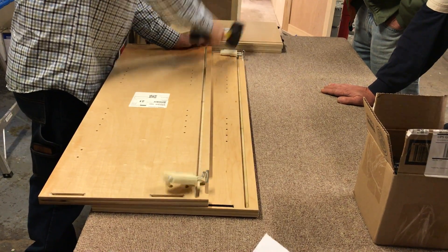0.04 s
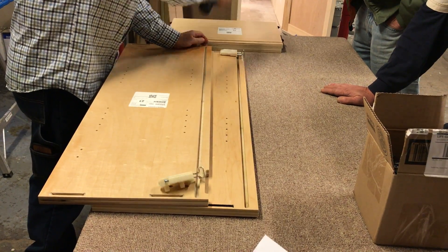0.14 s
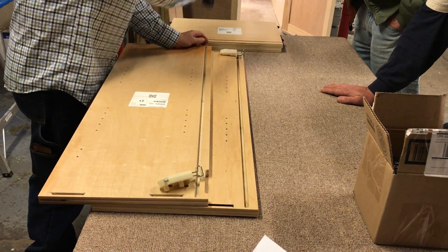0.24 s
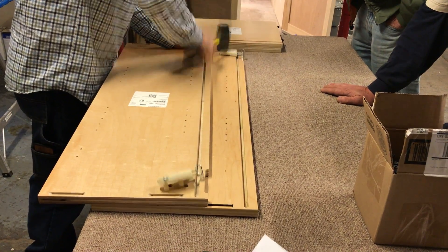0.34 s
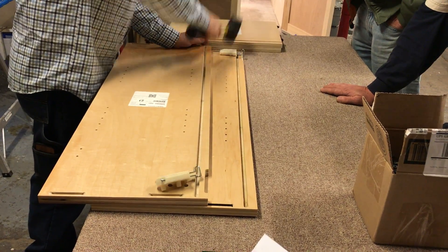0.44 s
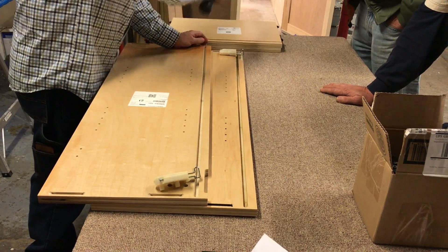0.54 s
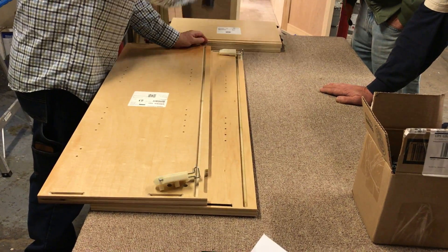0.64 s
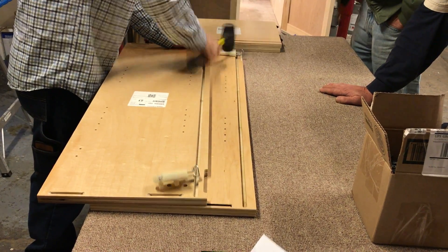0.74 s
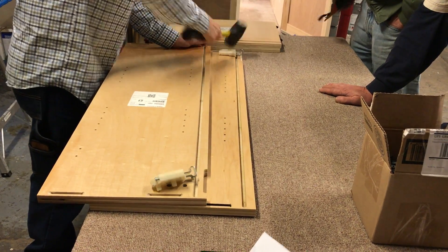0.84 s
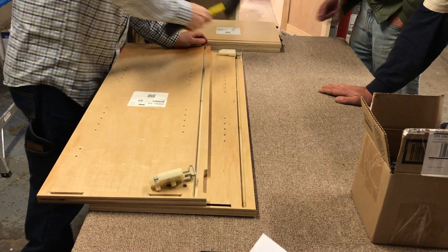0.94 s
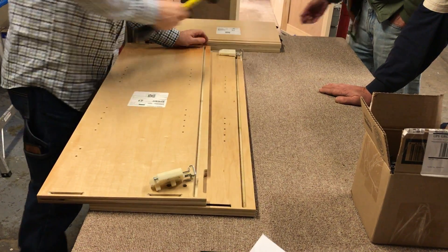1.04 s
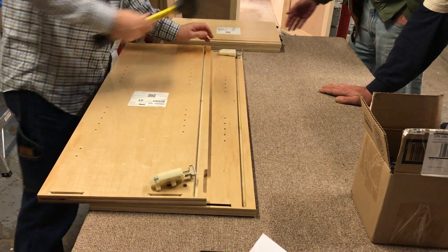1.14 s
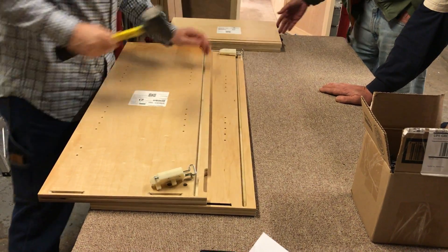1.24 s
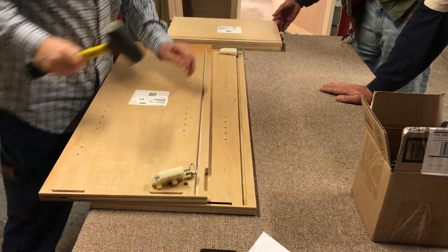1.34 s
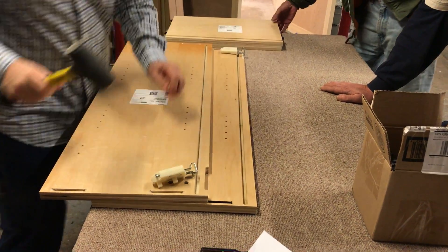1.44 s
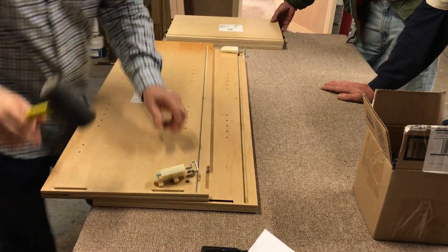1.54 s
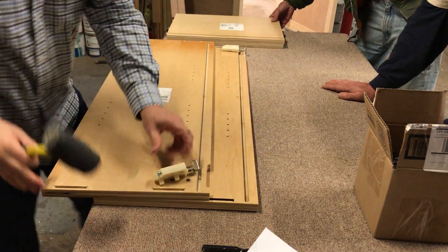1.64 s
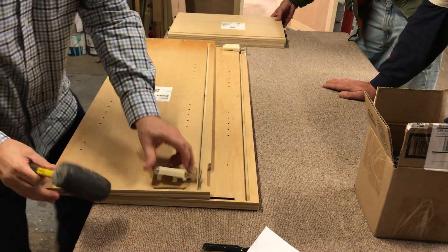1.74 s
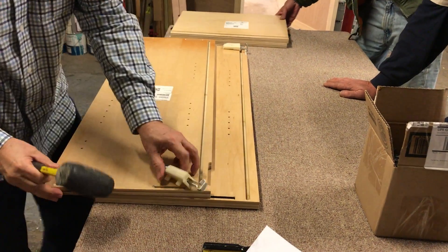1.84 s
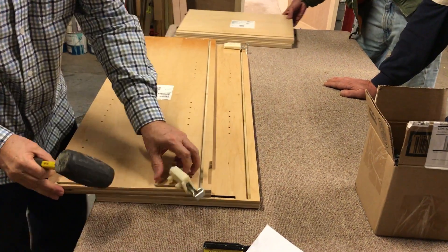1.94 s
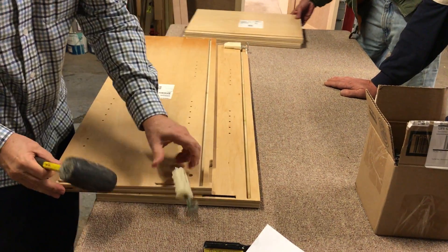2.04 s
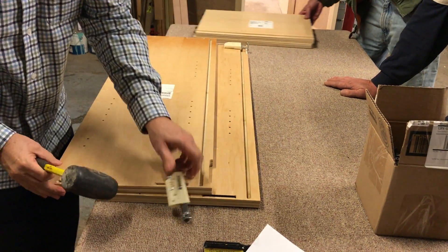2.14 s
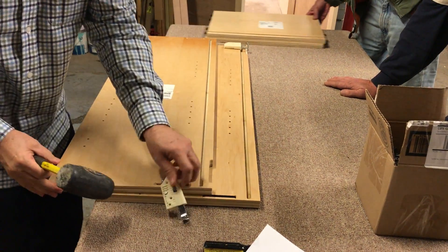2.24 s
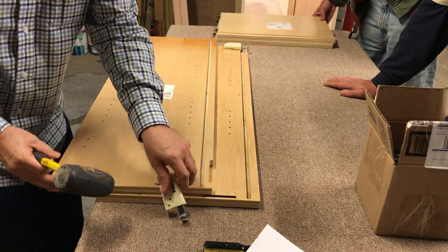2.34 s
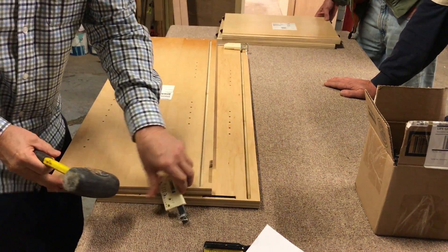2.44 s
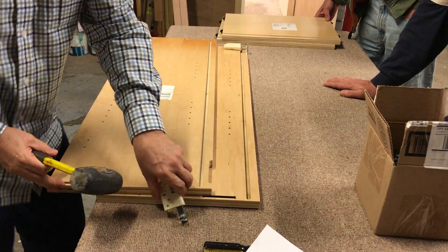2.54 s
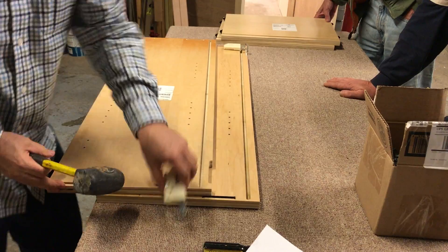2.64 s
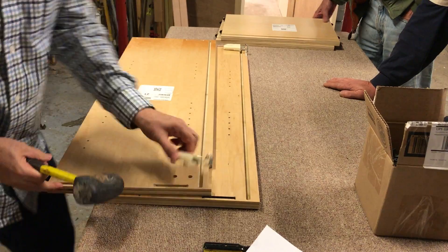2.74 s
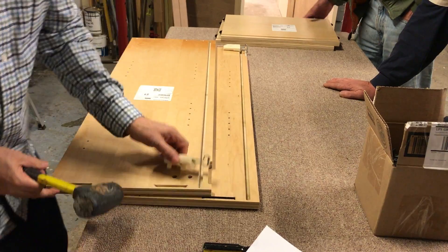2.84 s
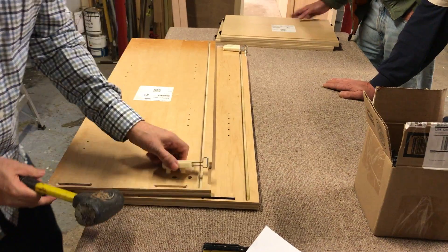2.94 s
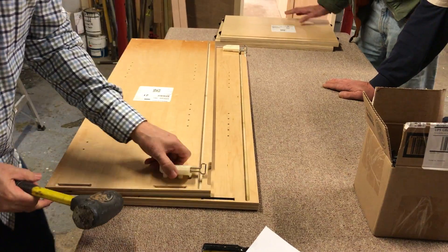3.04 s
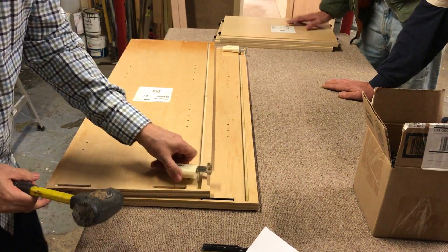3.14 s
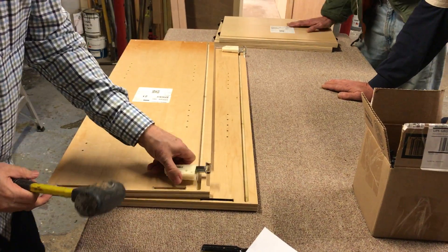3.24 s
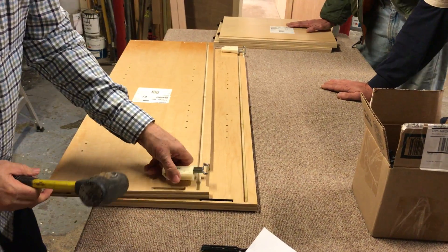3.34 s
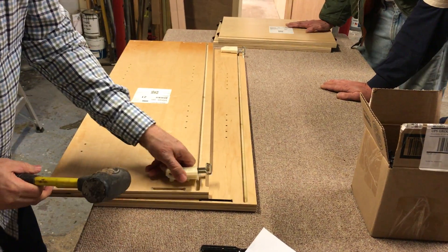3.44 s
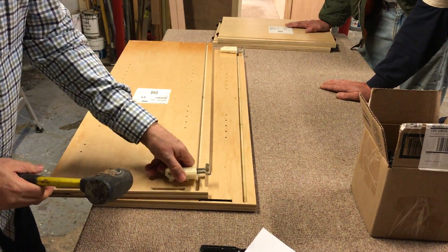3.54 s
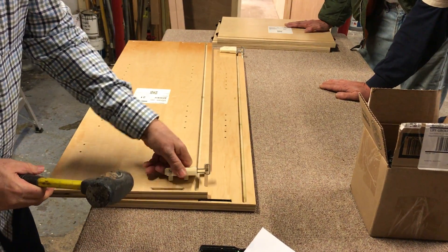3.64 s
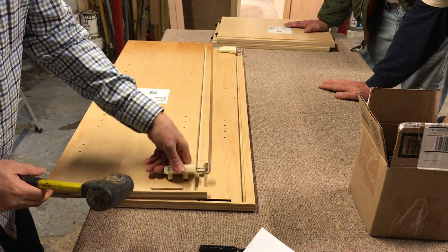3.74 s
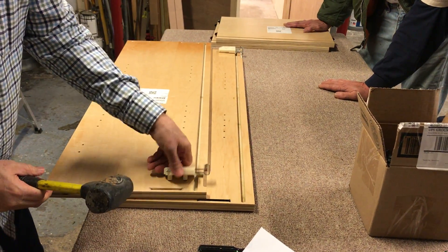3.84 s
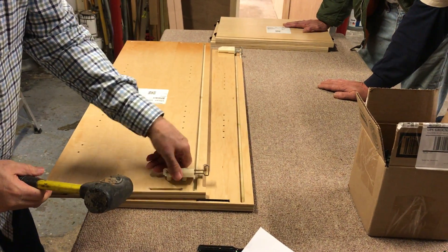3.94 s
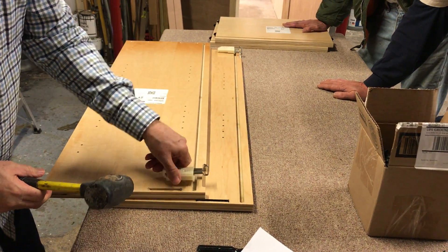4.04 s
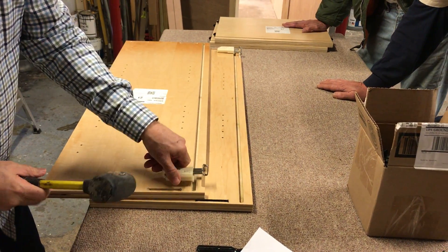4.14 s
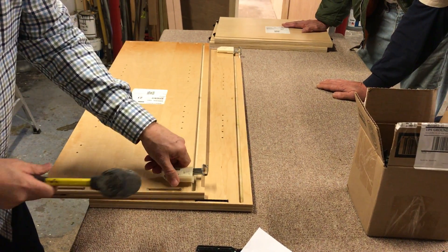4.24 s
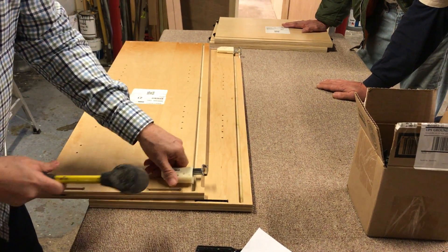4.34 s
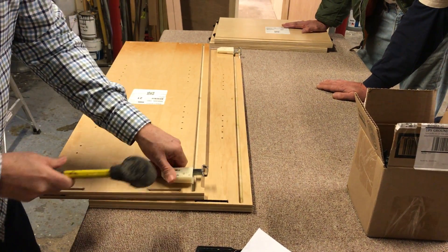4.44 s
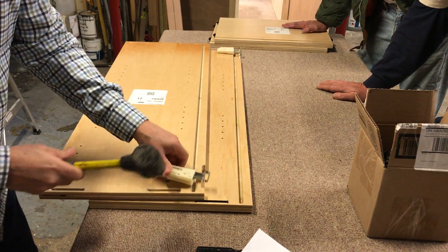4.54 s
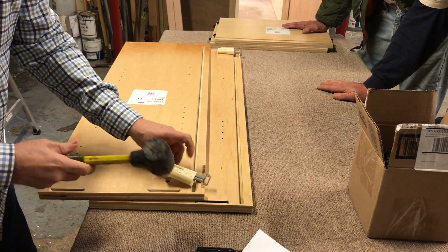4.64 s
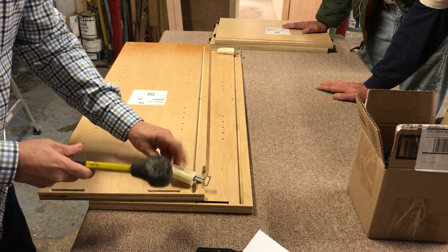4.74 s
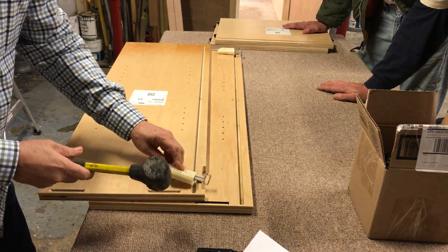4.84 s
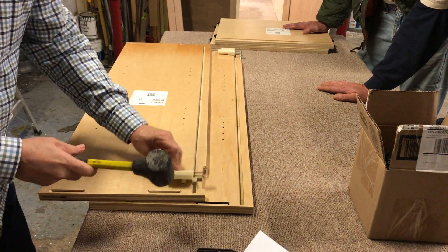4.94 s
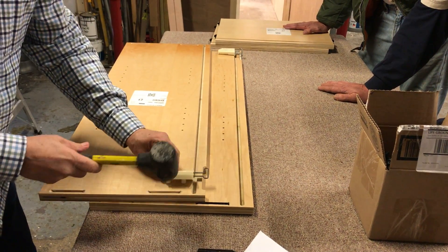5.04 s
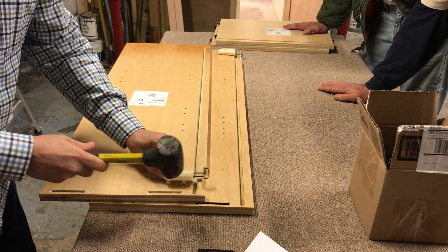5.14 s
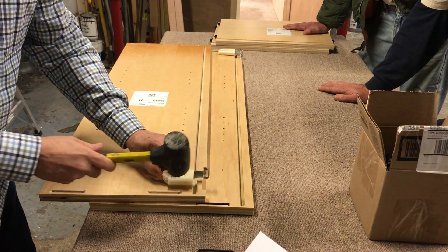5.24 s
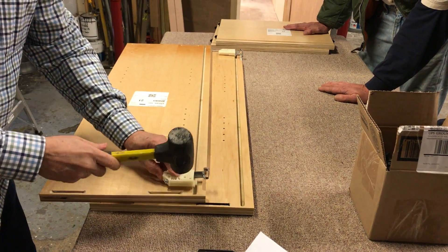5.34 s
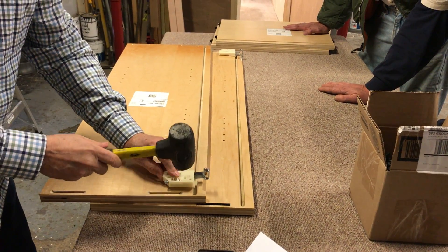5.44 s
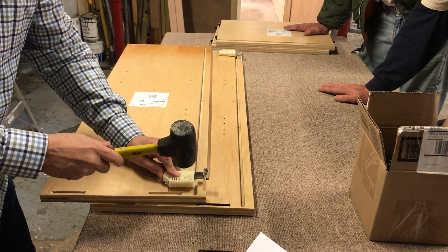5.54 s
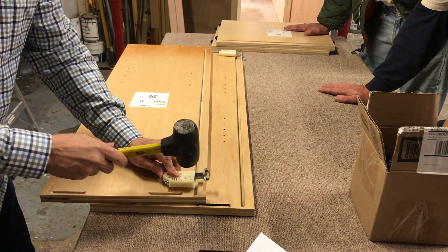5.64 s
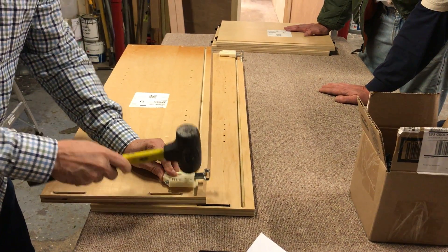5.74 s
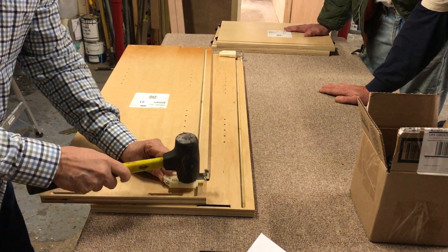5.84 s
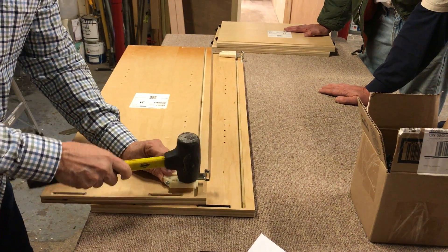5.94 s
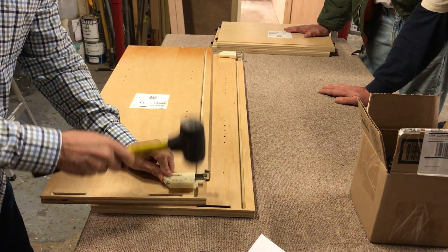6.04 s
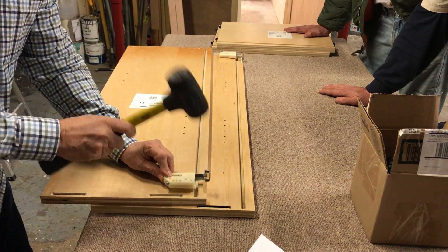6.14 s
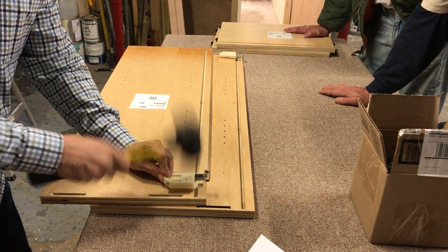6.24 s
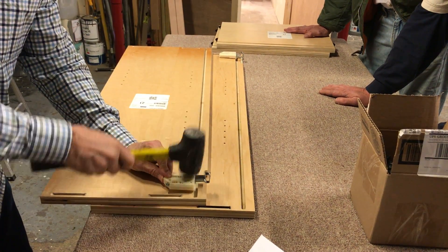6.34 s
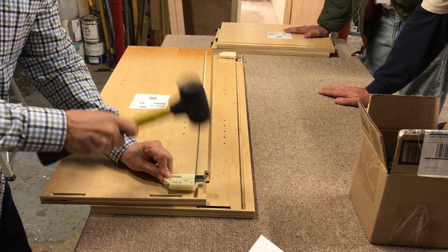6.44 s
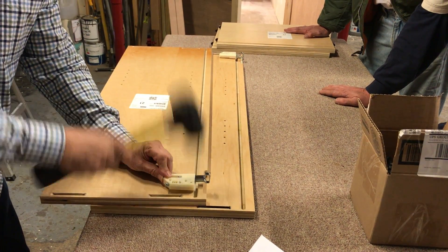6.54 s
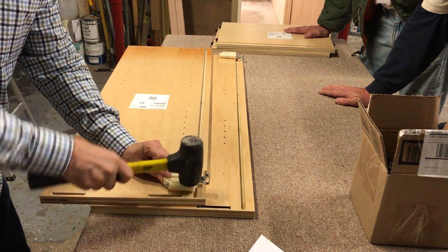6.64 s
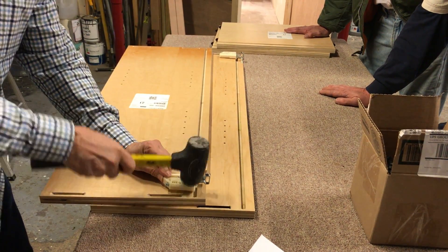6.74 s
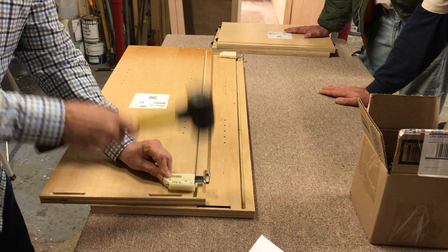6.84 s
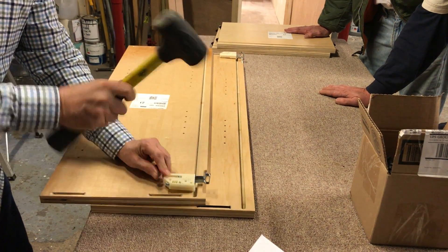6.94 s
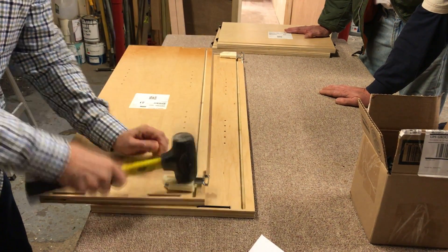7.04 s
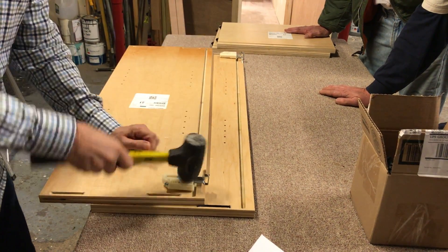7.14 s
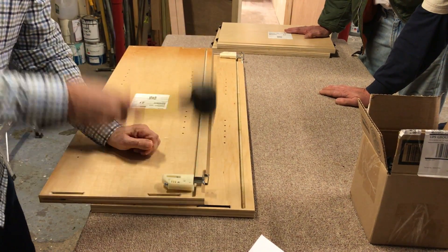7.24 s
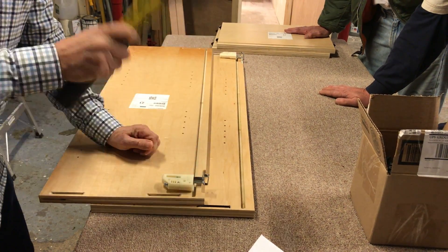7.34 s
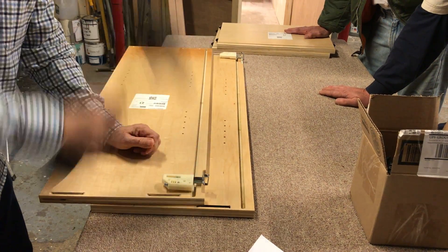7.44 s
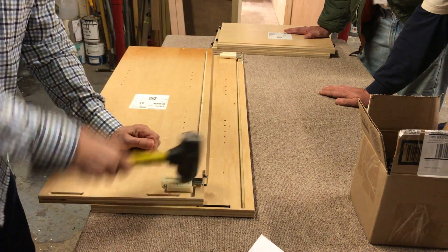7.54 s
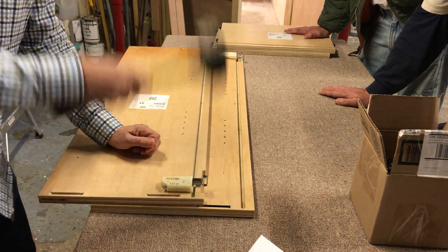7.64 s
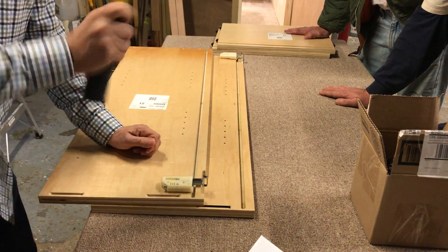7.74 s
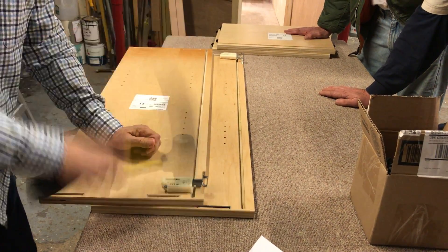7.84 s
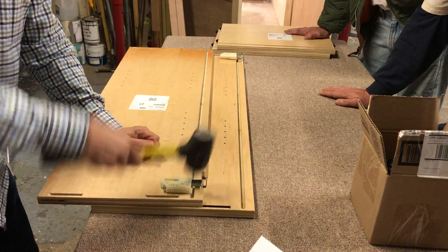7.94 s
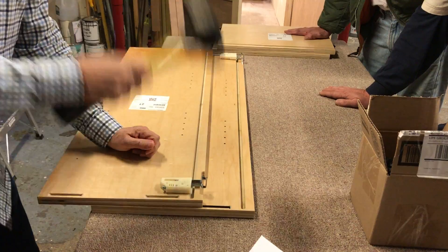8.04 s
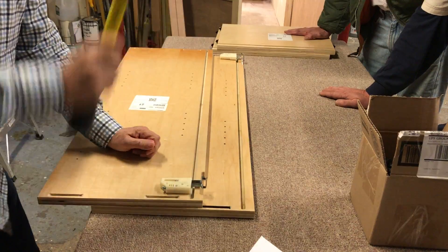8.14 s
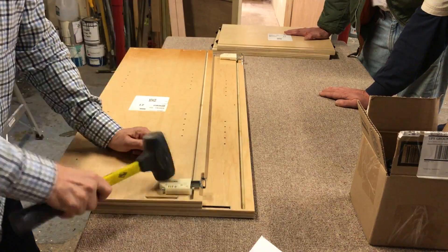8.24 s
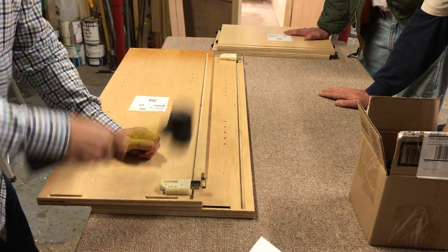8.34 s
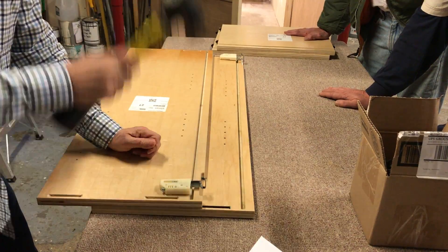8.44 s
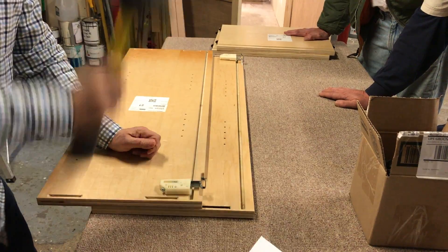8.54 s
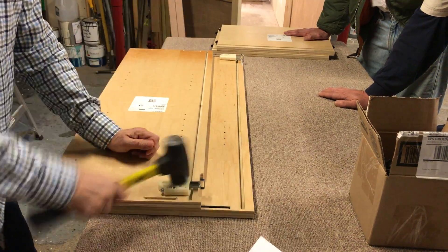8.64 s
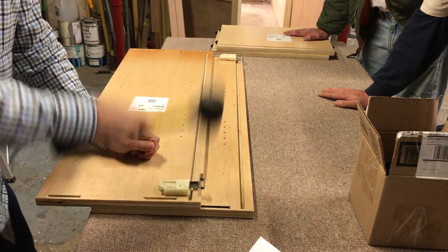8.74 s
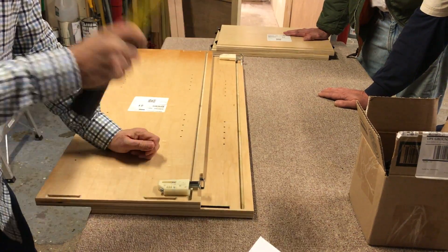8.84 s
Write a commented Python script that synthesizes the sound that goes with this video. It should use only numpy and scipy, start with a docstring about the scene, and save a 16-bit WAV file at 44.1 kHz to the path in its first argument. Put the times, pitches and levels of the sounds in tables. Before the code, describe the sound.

Three mallet blows on a wooden panel, then plastic rattling and quiet handling, a sharp tap, and seven heavier mallet blows over faint machine hum.

```python
"""A rubber mallet hits the far end of a wooden cabinet panel three times; each blow makes the panel ring and
tosses a loose plastic fitting, which bounces, while a steel catch jingles. The fitting is then picked up,
rattling and scraping as noise bursts and plastic rings, and a sleeve and soft bumps brush the wood. It is set
at the near end, tapped once (the mallet rebounds softly) and driven home with seven blows whose crack shrinks
with the gap. A machine hums in moving air throughout, with dips in level, and a fast limiter holds down the
loud peaks."""
import sys
import numpy as np
from scipy import signal
from scipy.fft import rfft, irfft, next_fast_len
from scipy.io import wavfile
from scipy.ndimage import uniform_filter1d, minimum_filter1d, map_coordinates

SR = 44100
rng = np.random.default_rng(int(sys.argv[2]) if len(sys.argv) > 2 else 0)


def generate_wav(signal):
    """Clip the signal to [-1, 1] and save it as 16-bit WAV at the path in sys.argv[1]."""
    frames = np.transpose(np.atleast_2d(signal))
    scaled = np.clip(frames, -1, 1) * 32767
    pcm = np.round(scaled).astype(np.int16)
    wavfile.write(sys.argv[1], SR, pcm)


N = 392049
T = np.arange(int(0.7 * SR)) / SR  # time within one short sound (s)

# Mallet blows: start_s, force_db (relative), hardness_db (treble), gap (left under the fitting, 0-1),
# place (0 near end, 1 far end)
MALLET_BLOWS = [(0.061, -3, 0.5, 0.52, 0.84), (0.446, -3.5, .5, 0.36, 0.95), (0.8414, -3, -0.5, .35, .95),
                (5.918, -30, -7.5, 0.82, 0.294), (6.368, -4.5, -2, 0.95, 0),
                (6.6837, -2.5, -5, 0.84, 0.018), (7.148, -2.5, 1.5, 0.86, 0.046),
                (7.588, -1.5, -1.5, 0.82, .1), (7.962, 0, -0.5, 0.22, 0.057),
                (8.3325, -4, 1.5, 0.44, 0.069), (8.715, 0, -2.5, 0.06, 0.025)]
# Color of the mallet's crack: pitch_hz, level_db (relative, per Hz)
CRACK_COLOR = [(300, -26), (2000, 2.5), (4000, 1.5), (6000, -4), (8500, 0), (11000, -2.5), (15000, -6)]
SEATED_FLEX_DB, GAP_FLEX_DB = -5.5, 10  # low bending of the panel with no gap; what a full gap adds
SOFT_FLEX = 0.76  # dB more low bending per dB less force: a light tap stays in contact longer
SEATED_CRACK_DB, GAP_CRACK_DB, FAR_CRACK_DB = -5, 9, -21.5  # crack with no gap; full gap and far end add


def mallet():
    """The head cracks on contact and the whole panel rings; a smaller gap gives less crack and low bending."""
    track = np.zeros(N)
    for start_s, force_db, hardness_db, gap, place in MALLET_BLOWS:
        flex_db = SEATED_FLEX_DB + GAP_FLEX_DB * gap - SOFT_FLEX * force_db
        crack_db = SEATED_CRACK_DB + GAP_CRACK_DB * gap + FAR_CRACK_DB * place
        crack_shape = fade(0.0052) + amp(-15) * fade(0.095)
        crack = amp(crack_db) * noise(CRACK_COLOR, len(T)) * crack_shape

        def hardness(hz):
            """Lift or lower the treble above about 1500 Hz, as a harder or softer contact does."""
            return (1500 + 1j * hz * amp(hardness_db)) / (1500 + 1j * hz)

        knock = filtered(panel(place, flex_db, grain_db=-7), hardness)
        # after a light tap the head stays down and damps the ring
        resting = fade(0.094 + 3 * amp(force_db))
        blow = amp(force_db) * (crack + knock * resting)
        add(track, start_s, in_room(blow, wet_db=-21.5))
    return track


# Clear ringing tones (modes) of the panel: pitch_hz, ring_s (time to die by 60 dB before other damping),
# near_db, far_db (relative strength when struck at either end)
PANEL_MODES = [(54, .25, -33, -37.5), (74.6, 0.057, -28.5, -27.5), (94.8, 0.35, -17, -16.5),
               (151, 0.18, -3, -16), (164.4, 0.12, -9.5, -8.5), (181.2, 0.21, -30, -9),
               (219, 0.28, -18.5, -20), (253.5, .3, -17.5, -30), (284.6, 0.5, -28.5, -33),
               (304.4, 0.16, -27, -9), (325.8, 0.22, -23, -15), (364, 0.17, -24, -21.5),
               (415.3, 0.21, -28, -22.5), (483, 0.083, -19.5, -20.5), (575, 0.12, -25, -16.5),
               (646.5, 0.11, -15.5, -23), (678.3, 0.2, -21.5, -20), (823, 0.084, -26, -28.5),
               (915, 0.17, -23.5, -27.5), (1091, 0.071, -18.5, -25), (1248, 0.13, -19.5, -16),
               (1338, 0.1, -22.5, -19), (1450, 0.054, -28, -14), (1510, .1, -30, -15),
               (1610, 0.05, -21, -22.5), (1831, 0.11, -20, -9.5), (2116, 0.085, -23.5, -19),
               (2520, .12, -22.5, -29), (2890, 0.15, -36.5, -27.5), (3074, .1, -25.5, -27),
               (3430, 0.035, -29, -35), (3700, 0.057, -32.5, -36.5), (3880, .1, -44.5, -30.5)]
# Color of the panel's crowded higher modes: pitch_hz, near_db, far_db (relative, per Hz)
CROWD_COLOR = [(25, -18, -25), (110, -11, -19.5), (281.7, 3, 2.5), (744, -1.5, -9), (1450, -3, -4),
               (2600, -7.5, -13.5), (4630, -19, -21.5), (9000, -26, -29.5), (14950, -19, -27.5)]
# How long the crowded modes last: pitch_hz, ring_s (time to die by 60 dB before other damping)
CROWD_RING = [(60, .2), (300, 0.16), (1500, 0.15), (5000, 0.15), (15000, 0.12)]


def panel(place, flex_db, grain_db):
    """A short contact push, clear modes and crowded ones, with strengths set by the place struck."""
    ring = np.zeros(len(T))
    for hz, ring_s, near_db, far_db in PANEL_MODES:
        place_db = near_db + place * (far_db - near_db)
        low_db = flex_db / (1 + (hz / 230) ** 4)
        level_db = place_db + low_db + rng.normal(0, 1)
        pitch_hz = hz * (1 + rng.normal(0, 0.006))
        start_cycle = rng.random() * (hz > 200)  # only modes above 200 Hz start at a random point
        tone = np.sin(2 * np.pi * (pitch_hz * T + start_cycle))
        ring += amp(level_db) * tone * fade(ring_s) * rise(0.0023 * 150 / hz)
    color = [(hz, near + place * (far - near)) for hz, near, far in CROWD_COLOR]
    crowd = dying(noise(color, len(T)), CROWD_RING) * rise(0.00081)
    # the contact rings for barely a cycle, more strongly toward the far end
    push_t = T - 0.0006
    push = np.sin(2 * np.pi * 2000 * push_t) * np.exp(-(push_t / 0.00024) ** 2)
    wave = ring + amp(grain_db) * (crowd + amp(17 * place) * push)
    # bending waves are slower at low pitch, so deep modes arrive last, the more so from the far end
    lag_at_1000_hz_s = 0.001091 + 0.0011 * place
    return filtered(wave, lambda hz: np.exp(-4j * np.pi * lag_at_1000_hz_s * np.sqrt(1000 * hz)))


HOP_S, BOUNCE_S, BOUNCE_SHRINK = 0.086, 0.023, 0.83  # first flight, first bounce, each bounce over the last
HOP_DB, BOUNCE_LOSS_DB = -29, 7  # first landing relative to the blow's force; loss per bounce
HOP_PRESSURE = 0.56  # pressure on the wood (0-1)


def hops():
    """A far-end blow tosses the fitting lying loose at the near end; it lands in ever quicker bounces."""
    track = np.zeros(N)
    for start_s, force_db, _, _, place in MALLET_BLOWS:
        if place > 0.5:
            for bounce in range(3):
                flight_s = HOP_S + BOUNCE_S * sum(BOUNCE_SHRINK ** j for j in range(bounce))
                level_db = force_db + HOP_DB - BOUNCE_LOSS_DB * bounce
                add(track, start_s + flight_s, click(level_db, HOP_PRESSURE))
    return track


# The fitting is picked up, rattles and snaps into its holes: start_s, level_db (relative),
# pressure (on the wood, 0-1)
FITTING_CLICKS = [(1.8364, -24, 0.62), (1.9618, -29.5, 0.27), (2.143, -29.5, 0.14), (2.192, -19.5, 0.14),
                  (2.2323, -30, 0), (2.2443, -23, 0.14), (2.2843, -23, 0.13), (2.3118, -23, 0.12),
                  (2.3202, -25, 0.15), (2.3812, -28.5, 0.13), (2.6594, -34.5, .05), (2.9827, -35, 1),
                  (3.1139, -32.5, 0.69), (3.903, -38, .95), (3.9597, -31.5, 0.41), (4.6826, -36, 0.36),
                  (4.7053, -36.5, 0.5), (4.8722, -40, 0.23), (5.031, -37, 0.96), (5.0601, -29.5, .62),
                  (5.907, -19.5, 0.06), (5.9131, -18, 0.37)]
# Ticks of loose parts while the fitting is turned in the hand: start_s, end_s, ticks_per_s,
# level_db (relative, before random variation)
LOOSE_RATTLES = [(2.235, 2.335, 45, -37), (2.55, 2.881, 6, -47), (5.284, 5.349, 30, -43)]
THUD_DB, THUD_FLEX_DB = 5.5, -7.5  # panel thud relative to the click at full pressure; its low bending


def fitting():
    """The fitting clicks and, as far as it is pressed down, thuds on the panel; loose parts tick unevenly."""
    track = np.zeros(N)
    for start_s, level_db, pressure in FITTING_CLICKS:
        panel_thud = thud(level_db + THUD_DB, THUD_FLEX_DB)
        add(track, start_s, click(level_db, pressure) + pressure * panel_thud)
    for start_s, end_s, ticks_per_s, level_db in LOOSE_RATTLES:
        for tick_s in scattered(start_s, end_s, ticks_per_s):
            add(track, tick_s, click(level_db + rng.normal(0, 2.2), pressure=0))
    return track


# Ringing tones of the plastic shell: pitch_hz, width_hz (wider dies sooner),
# level_db (relative, before random variation)
PLASTIC_TONES = [(2900, 90, -3.5), (4110, 320, -13.5), (7170, 190, -3.5), (8570, 87, -3.5),
                 (9430, 100, -2.5), (12670, 290, -10), (14200, 110, -12.5), (14800, 160, -15)]
# Color of a plastic snap before the treble tilt: pitch_hz, level_db (relative, per Hz)
SNAP_COLOR = [(600, -19.5), (1500, -5), (3000, 8.5), (5500, 0), (9000, -1), (15000, 0)]
# Color of the wood under a click: pitch_hz, level_db (relative, per Hz)
KNOCK_COLOR = [(100, -17.5), (300, 6.5), (700, -8), (1050, -7), (1280, -3.5), (1700, -9.5), (2200, -7),
               (4000, -23)]
FREE_TREBLE_DB, PRESSED_TREBLE_DB = 9.5, -32  # tilt per tenfold pitch when free; what full pressure adds
KNOCK_DB = -6.5  # wood knock at full pressure, relative to the click


def click(db, pressure):
    """One plastic contact chatters briefly and rings the shell; pressed on the wood it is duller and knocks."""
    ring = np.zeros(len(T))
    for hz, width_hz, level_db in PLASTIC_TONES:
        tone = np.sin(2 * np.pi * hz * T) * np.exp(-np.pi * width_hz * T)
        ring += amp(level_db + rng.normal(0, 3.15)) * tone
    treble_db = FREE_TREBLE_DB + PRESSED_TREBLE_DB * pressure ** 3
    color = [(hz, level_db + treble_db * np.log10(hz / 3000)) for hz, level_db in SNAP_COLOR]
    snap = noise(color, len(T)) * (fade(0.0072) + amp(-12.5) * fade(0.084))
    contact = amp(-16.5) * ring + amp(-3.5) * snap
    second_contact = np.roll(contact, int(SR * rng.uniform(0.0007, 0.0038)))
    chatter = contact + amp(-4.5) * second_contact
    knock = noise(KNOCK_COLOR, len(T)) * fade(0.07)
    return in_room(amp(db) * (chatter + pressure * amp(KNOCK_DB) * knock), wet_db=-15.5)


def thud(db, flex_db):
    """A dull knock on the panel: the hand damps its ring, and the treble is filtered away."""
    damped = panel(place=0.37, flex_db=flex_db, grain_db=-9) * fade(0.21)
    knock = in_room(amp(db) * damped, wet_db=-9.5)
    return filtered(knock, lambda hz: 1 / (1 + 1j * hz / 900))


# Shakes of the loose steel catch: start_s, level_db (relative)
CATCH_JINGLES = [(0.15, -50), (0.175, -46.5), (0.237, -50), (1.962, -46.5)]
# Color of the steel: pitch_hz, level_db (relative, per Hz)
STEEL_COLOR = [(1500, -36.5), (4000, -30), (4560, -5), (5100, -24.5), (9000, -19), (16000, -30.5)]


def catch():
    """The loose steel catch chatters in short, broken jingles of metal-colored noise."""
    track = np.zeros(N)
    for start_s, level_db in CATCH_JINGLES:
        ring = noise(STEEL_COLOR, len(T)) * slips(1.9, size=250) * fade(0.16) * rise(0.001)
        add(track, start_s, in_room(amp(level_db) * ring, wet_db=-15.5))
    return track


# Scrapes of the fitting over the wood: middle_s, half_length_s, level_db (relative), center_hz
WOOD_SCRAPES = [(1.80, 0.024, -51.5, 4000), (1.883, 0.085, -42.5, 950), (3.79, 0.091, -57.5, 1530),
                (4.70, 0.092, -57.5, 3120), (5.067, 0.045, -46, 2750), (6.01, .06, -52.5, 1500),
                (6.12, .09, -57.5, 1400)]
# When fingers shift on the fitting as it is being seated: start_s, end_s
FINGER_TIMES = (3.15, 6)
FINGER_SLIDES_PER_S, FINGER_HALF_LENGTH_S, FINGER_DB, FINGER_CENTER_HZ = 2.5, 0.13, -69.5, 5500


def scrapes():
    """Short slides of the fitting and the fingers, grainy from sticking and slipping."""
    track = np.zeros(N)
    finger_times = scattered(*FINGER_TIMES, FINGER_SLIDES_PER_S)
    fingers = [(s, FINGER_HALF_LENGTH_S, FINGER_DB, FINGER_CENTER_HZ) for s in finger_times]
    for middle_s, half_s, level_db, hz in [*WOOD_SCRAPES, *fingers]:
        color = [(hz / 4, -22), (hz / 2.1, -8), (hz, 0), (hz * 1.4, -9), (hz * 4, -24)]
        stroke = np.sin(np.pi / 2 * np.minimum(T / half_s, 2)) ** 2  # swells, then fades
        slide = noise(color, len(T)) * slips(3.7, size=180) * stroke
        add(track, middle_s - half_s, amp(level_db) * slide)
    return track


def slips(depth_db, size):
    """Sticking and slipping as an uneven gain of rms 1, smoothed over size samples."""
    uneven = uniform_filter1d(rng.standard_normal(len(T)), size=size)
    return unit(amp(depth_db * unit(uneven)))


# Soft bumps on the panel, the last being the mallet's rebound after the light tap: start_s, level_db (relative)
PANEL_BUMPS = [(1.874, -34), (1.98, -42.5), (3.55, -44.5), (3.721, -42.5), (5.969, -32.5)]
# Jolts of the bench: start_s, level_db (relative)
BENCH_JOLTS = [(1.875, -36)]
# Color of the sleeve's cloth: pitch_hz, level_db (relative, per Hz)
CLOTH_COLOR = [(120, -15), (260, 7), (450, -12.5), (750, -10), (1500, -13.5), (3000, -17.5), (6000, -21.5),
               (10000, -26.5), (16000, -34)]
BUMP_FLEX_DB = 11  # a soft bump is nearly all low bending
RUB_S, RUB_DB = 1.904, -47  # time and level of the sleeve's peak, before random variation
RUB_RISE_DB_PER_S, RUB_FALL_DB_PER_S = 55.5, 19


def hand():
    """The panel is bumped (last by the mallet rebounding after the light tap), the bench thuds as low noise and
    the sleeve brushes past as cloth noise."""
    track = np.zeros(N)
    for start_s, level_db in PANEL_BUMPS:
        add(track, start_s, thud(level_db, BUMP_FLEX_DB))
    for start_s, level_db in BENCH_JOLTS:
        rumble = noise([(20, -12), (50, -2), (120, -8), (400, -50)], len(T))
        add(track, start_s, amp(level_db) * rumble * rise(0.008) * fade(0.21))
    t = np.arange(N) / SR - RUB_S
    rub_db = RUB_DB + np.minimum(RUB_RISE_DB_PER_S * t, -RUB_FALL_DB_PER_S * t)
    return track + amp(rub_db + 2.3 * wobble(30)) * noise(CLOTH_COLOR, N)


# Tones of the machine: pitch_hz, level_db (relative)
HUM_TONES = [(70, -51), (118.4, -58), (140, -62), (209.9, -63), (285.3, -62)]
# Color of the moving air: pitch_hz, level_db (relative, per Hz)
AIR_COLOR = [(25, -33.5), (50, -15), (75, -14), (97, -18), (130, -9.5), (170, -14.5), (210, -13),
             (285, -12.5), (400, -21), (640, -23), (1400, -27.5), (3000, -33), (6000, -42), (16000, -47)]
# Rise and fall of the background, used relative to its median: time_s, level_db
BACKGROUND_LEVEL = [(0.0, -45.5), (0.12, -51), (0.71, -56.5), (1.34, -62.5), (1.78, -50.5), (5.72, -50),
                    (6.49, -48.5), (7.48, -49), (7.87, -49.5), (8.1, -53.5), (8.79, -55.5), (8.89, -54)]
HUM_DB, AIR_DB = 1.66, -54.5  # gain on the hum and level of the air at the median
AIR_FOLLOWS = 0.61  # share of each level change that the air follows


def workshop():
    """A machine's gently wavering hum over moving air; the hum sinks further than the air does."""
    t = np.arange(N) / SR
    level_db = curve(BACKGROUND_LEVEL)
    dip_db = level_db - np.median(level_db)
    hum = np.zeros(N)
    for hz, tone_db in HUM_TONES:
        # higher tones waver more in level and phase
        strength = amp(tone_db + hz / 200 * wobble(3.8))
        hum += strength * np.sin(2 * np.pi * hz * t + hz / 400 * wobble(6.4))
    air = noise(AIR_COLOR, N)
    return amp(HUM_DB + dip_db) * hum + amp(AIR_DB + AIR_FOLLOWS * dip_db) * air


# How long the room rings: pitch_hz, ring_s (time to die by 60 dB)
ROOM_RING = [(60, 0.36), (250, 0.57), (1200, 0.49), (3000, 0.38), (6000, 0.32), (15000, 0.17)]
ROOM_BUILD_S = 0.015  # time the room's answer takes to swell


def in_room(sound, wet_db):
    """Add the workshop's diffuse answer, which keeps the sound's broad color but blurs its single modes."""
    tail = dying(rng.standard_normal(len(T)), ROOM_RING) * rise(ROOM_BUILD_S)
    power = np.abs(rfft(sound)) ** 2
    color = np.sqrt(np.abs(uniform_filter1d(power, size=121)))
    answer = irfft(rfft(tail / np.linalg.norm(tail)) * color, len(T))
    return sound + amp(wet_db) * answer


def amp(db):
    """Turn decibels into a gain."""
    return 10 ** (np.asarray(db) / 20)


def unit(x):
    """Scale to rms 1 (rms is a kind of average strength)."""
    return x / np.sqrt(np.mean(x ** 2) + 1e-20)


def along(points, hz):
    """Read (pitch_hz, value) points on a log pitch axis."""
    pitch_hz, value = np.transpose(points)
    return np.interp(np.log(hz + 1), np.log(pitch_hz + 1), value)


def curve(rows):
    """Join (time_s, value) rows by straight lines, one value per sample."""
    return np.interp(np.arange(N) / SR, *np.transpose(rows))


def wobble(rate):
    """A smooth random curve with rate random points a second."""
    points = rng.standard_normal(int(N * rate / SR) + 4)
    return map_coordinates(points, [np.arange(N) * rate / SR])


def filtered(x, response):
    """Reshape a sound by a response given for each pitch in Hz."""
    size = next_fast_len(len(x) + SR // 4)
    return irfft(rfft(x, size) * response(np.fft.rfftfreq(size, 1 / SR)), size)[:len(x)]


def noise(spectrum, size):
    """Random noise of rms 1, colored by (pitch_hz, level_db) points."""
    white = rng.standard_normal(size)
    return unit(filtered(white, lambda hz: amp(along(spectrum, hz))))


def fade(ring_s):
    """A decay of 60 dB in ring_s seconds."""
    return np.exp(-np.log(1000) * T / ring_s)


def rise(seconds):
    """A soft start."""
    return 1 - np.exp(-(T / seconds) ** 2)


def dying(x, decays):
    """Let each pitch die at its own speed, given as (pitch_hz, ring_s) points."""
    hz, t, z = signal.stft(x, SR, nperseg=256)
    decay = np.exp(-np.log(1000) * t / along(decays, hz)[:, None])
    return signal.istft(z * decay, SR)[1][:len(x)]


def add(track, start_s, sound):
    """Mix a sound into the track at start_s."""
    part = track[round(start_s * SR):][:len(sound)]
    part += sound[:len(part)]


def scattered(start_s, end_s, rate):
    """Uneven times between start_s and end_s, about rate a second."""
    count = max(1, round((end_s - start_s) * rate))
    return start_s + (end_s - start_s) * (np.arange(count) + rng.random(count)) / count


def scene():
    """Everything at the one microphone."""
    return (mallet() + hops() + fitting() + catch() + scrapes() + hand() + workshop())[None]


TOP_HZ = 15650  # upper edge of the sound


def record(dry):
    """A fast limiter holds the peaks down; a steep filter then removes what lies above the upper edge."""
    ceiling = 0.68
    needed = np.minimum(1, ceiling / (np.abs(dry[0]) + 1e-9))
    # hold the lowest gain over 89 samples (about 2 ms), then smooth it
    gain = uniform_filter1d(minimum_filter1d(needed, size=89), size=45)
    return filtered(dry[0] * gain, lambda hz: 1 / np.sqrt(1 + (hz / TOP_HZ) ** 120))[None]


dry = scene()
out = record(dry)
generate_wav(out)
```